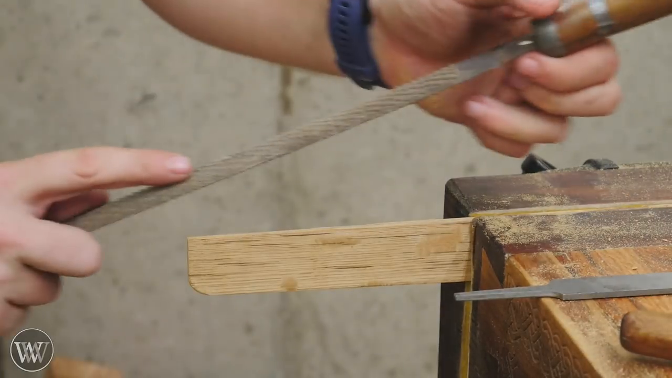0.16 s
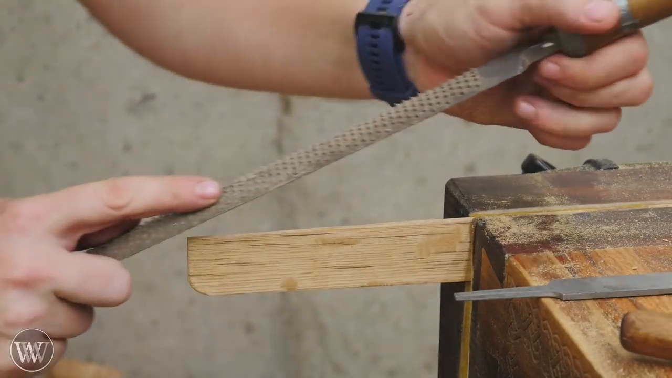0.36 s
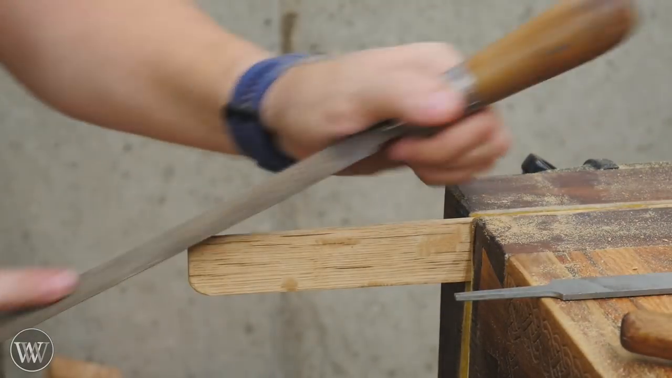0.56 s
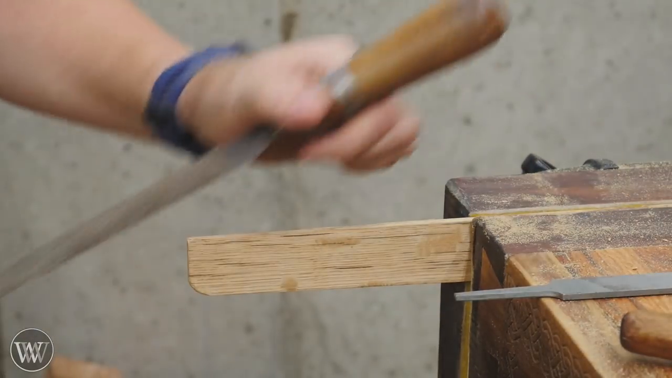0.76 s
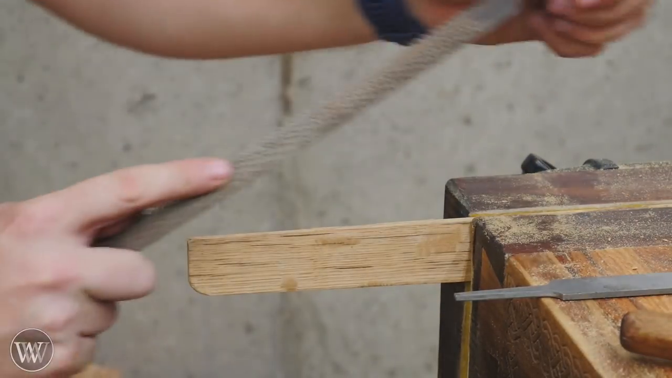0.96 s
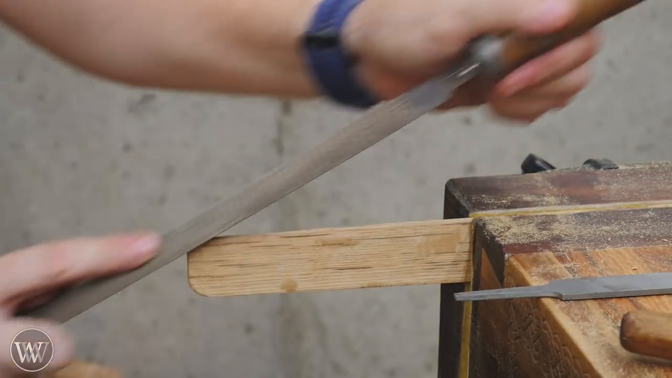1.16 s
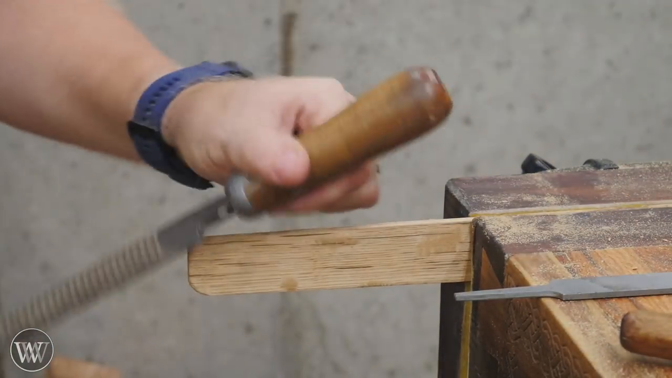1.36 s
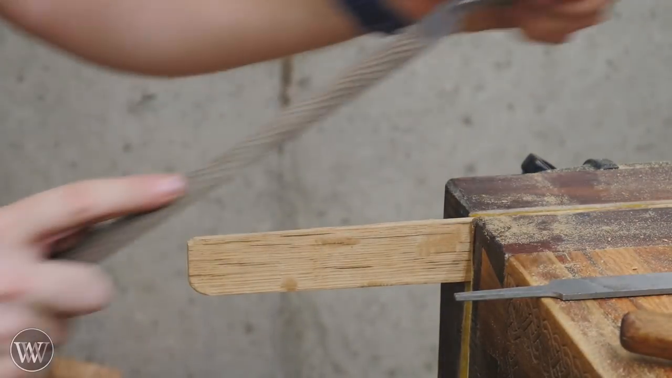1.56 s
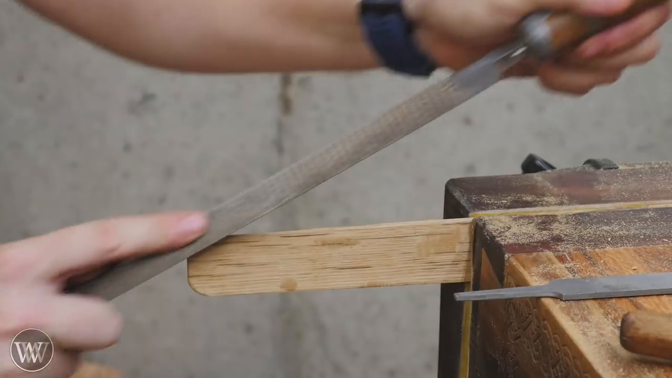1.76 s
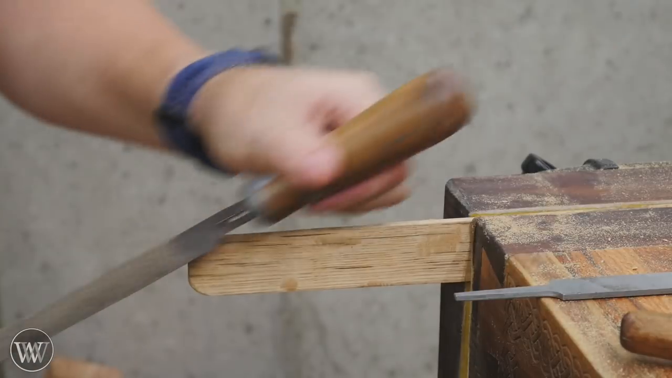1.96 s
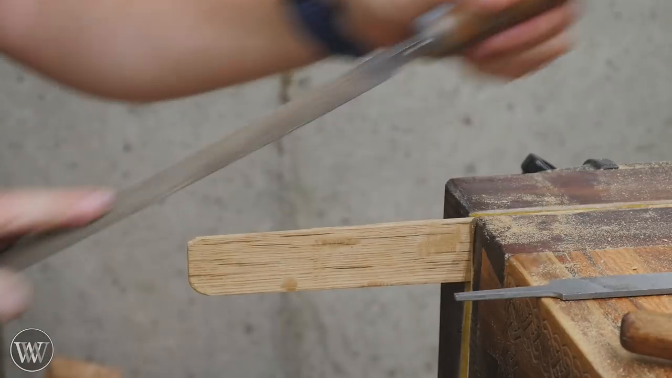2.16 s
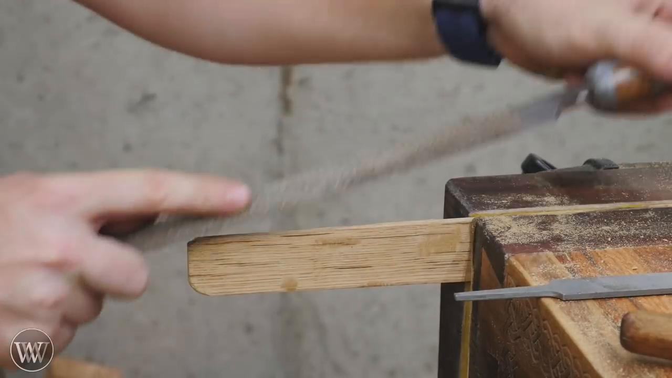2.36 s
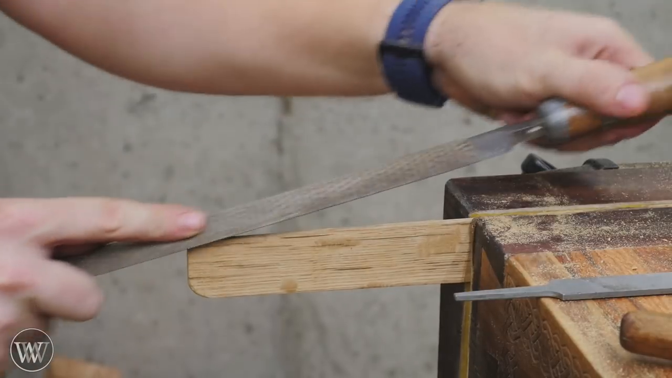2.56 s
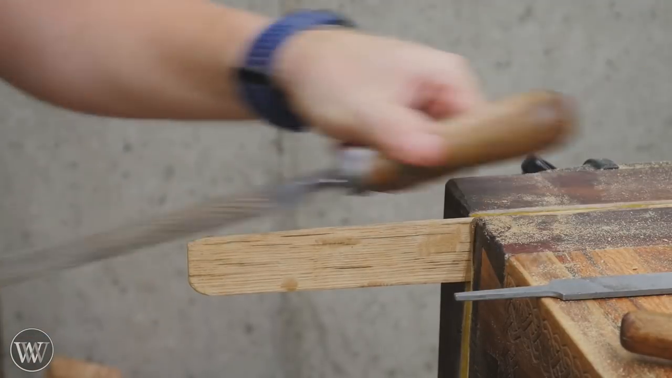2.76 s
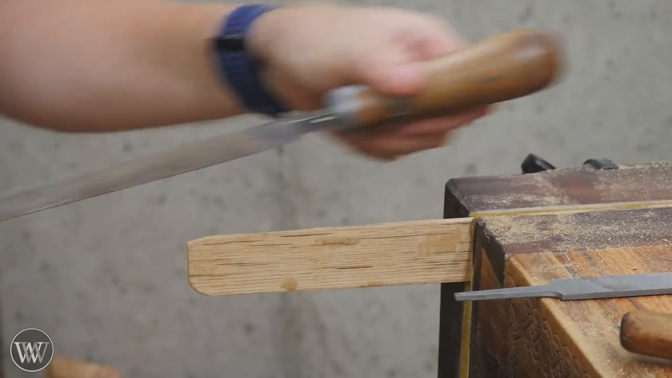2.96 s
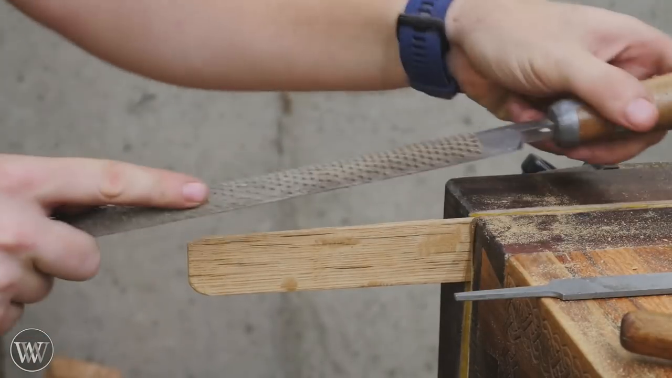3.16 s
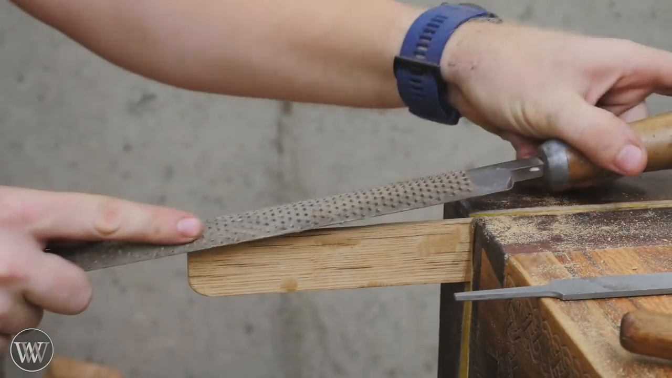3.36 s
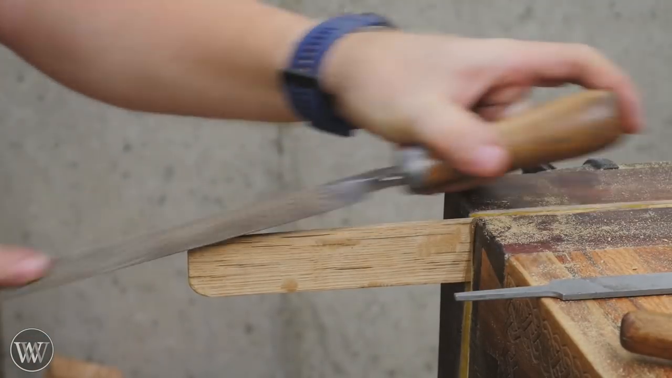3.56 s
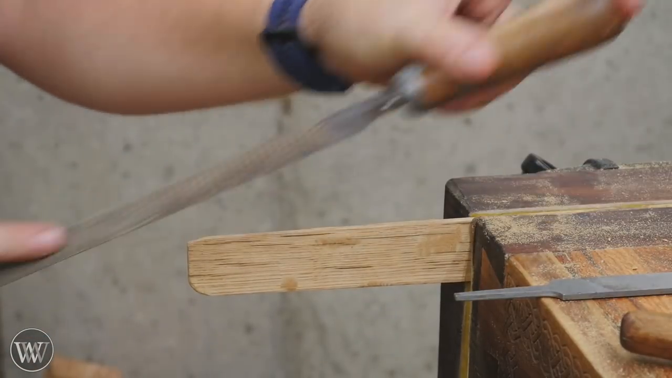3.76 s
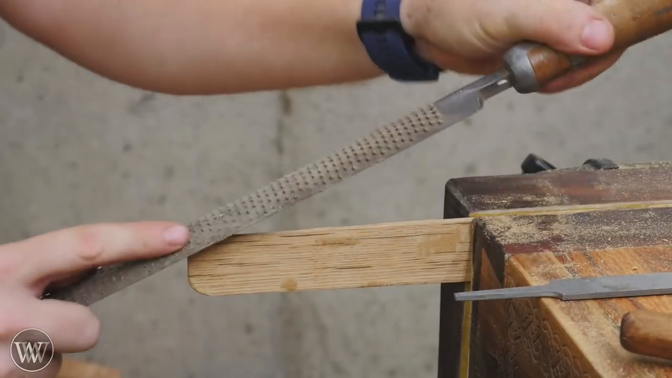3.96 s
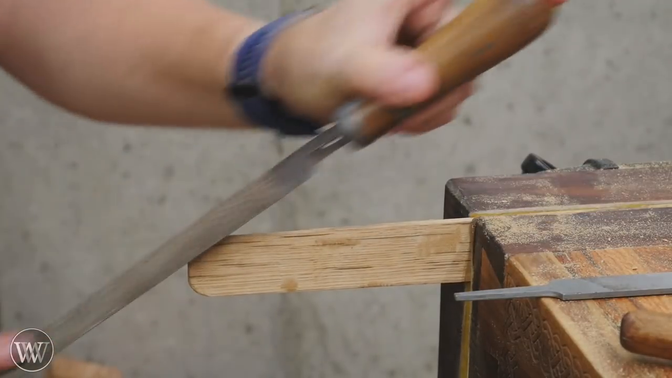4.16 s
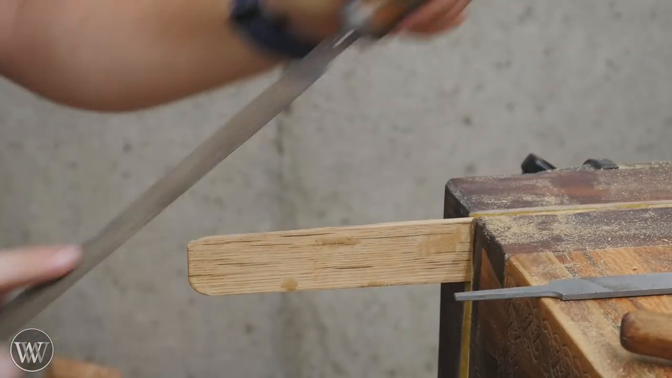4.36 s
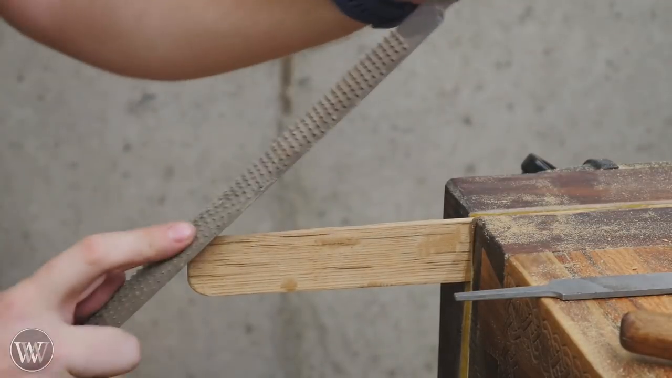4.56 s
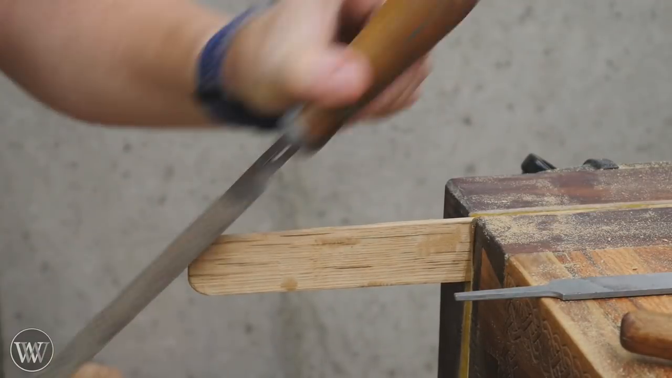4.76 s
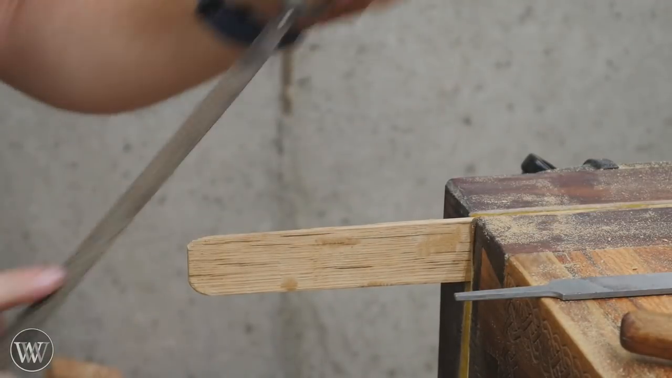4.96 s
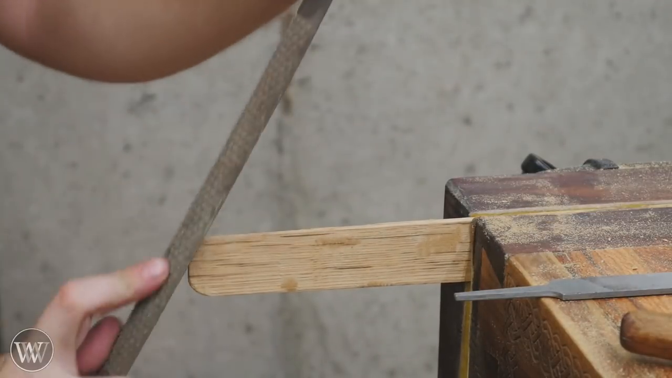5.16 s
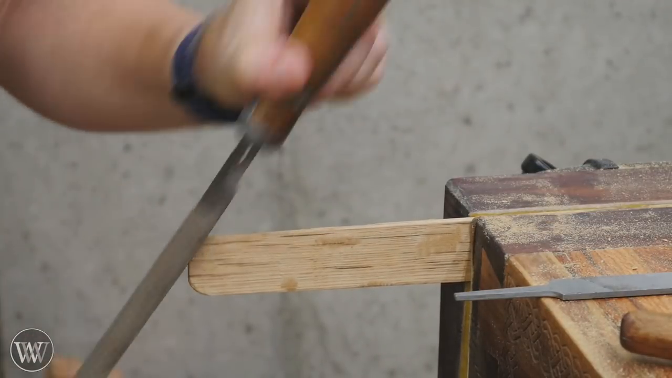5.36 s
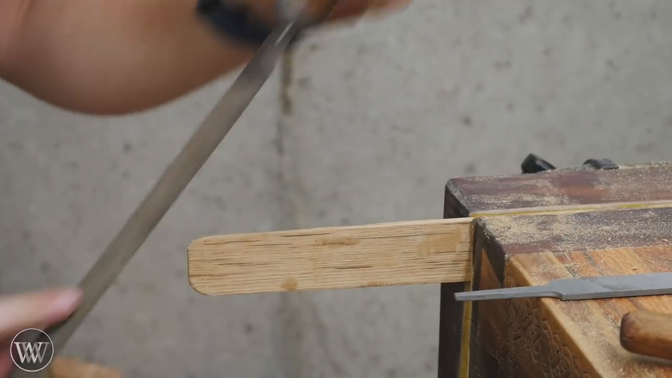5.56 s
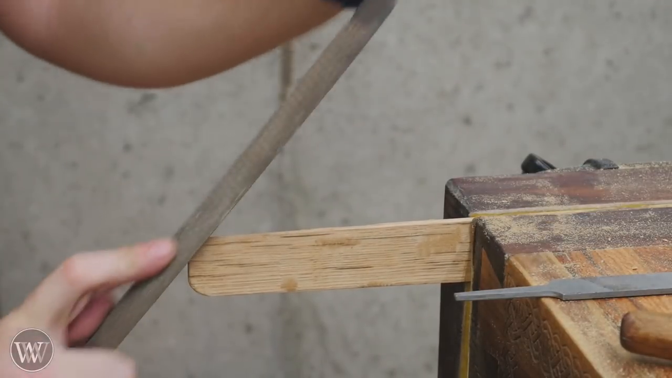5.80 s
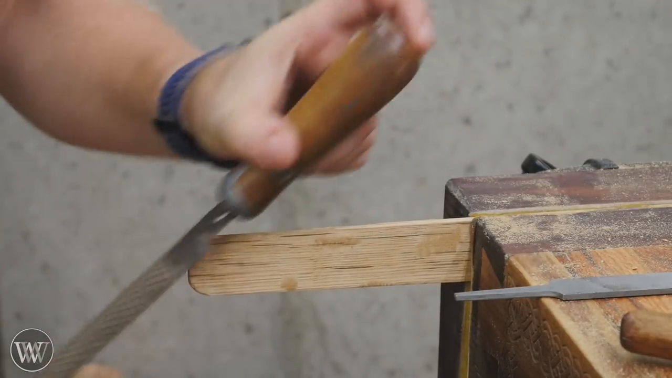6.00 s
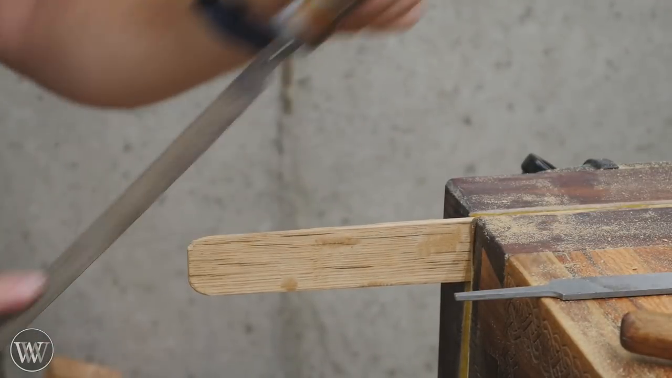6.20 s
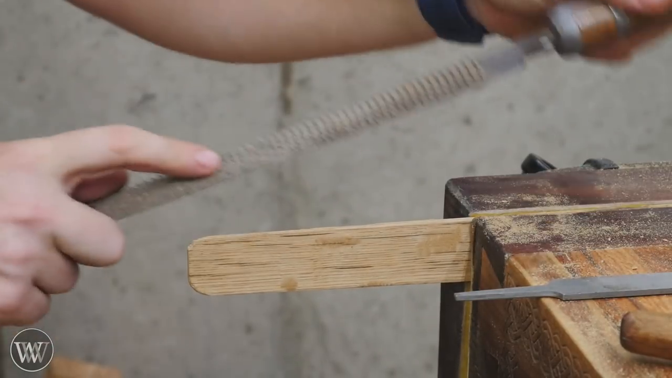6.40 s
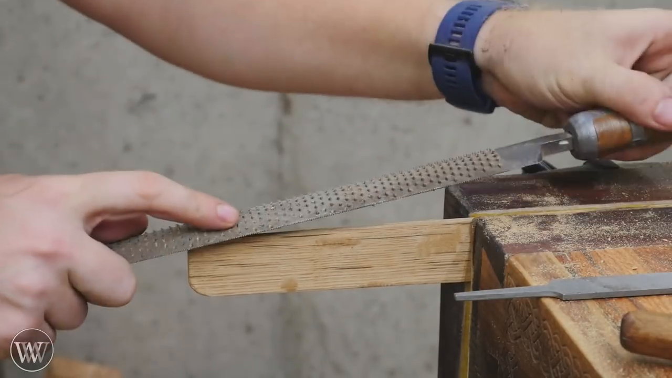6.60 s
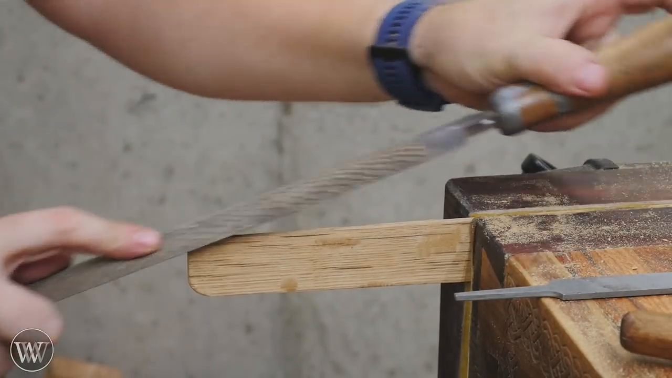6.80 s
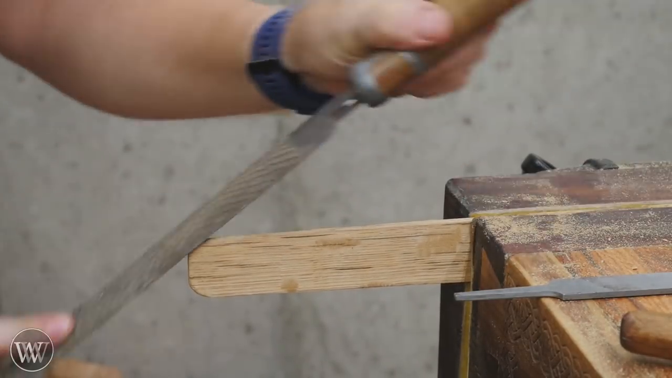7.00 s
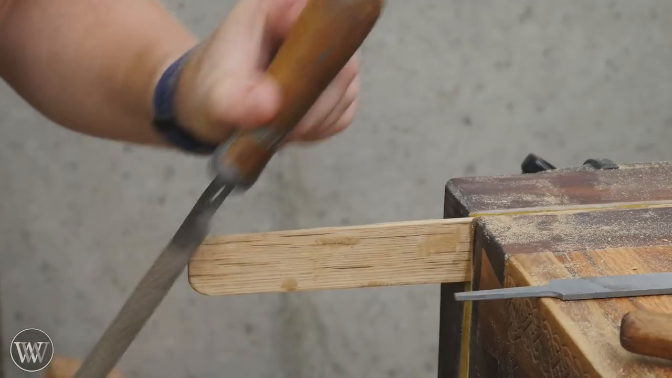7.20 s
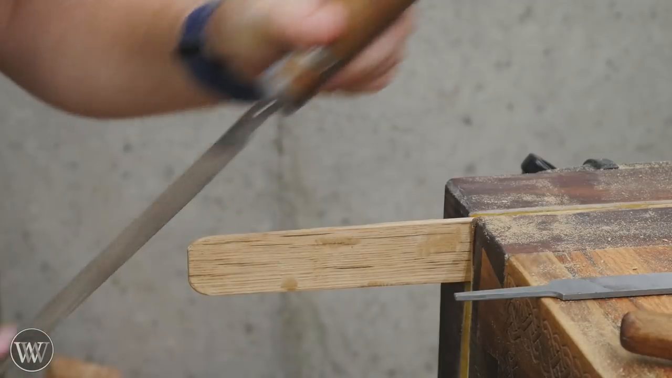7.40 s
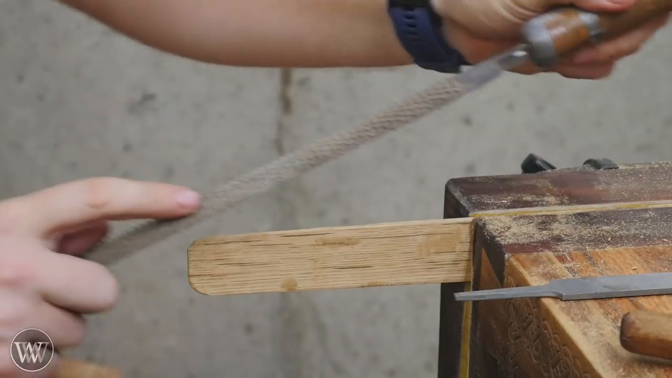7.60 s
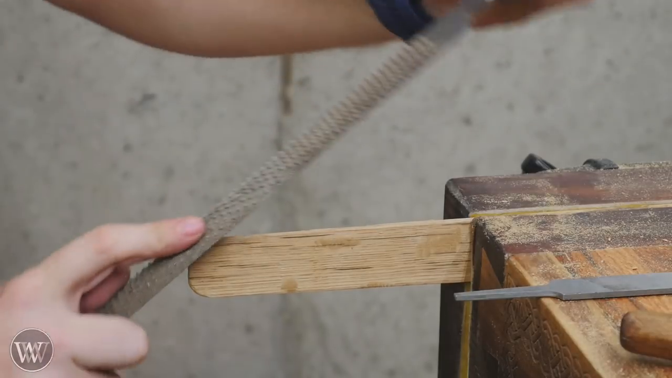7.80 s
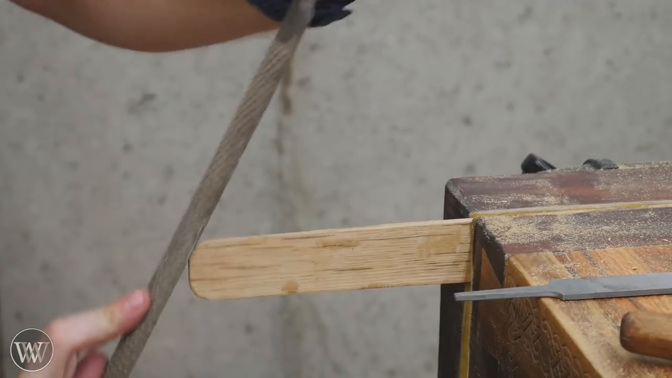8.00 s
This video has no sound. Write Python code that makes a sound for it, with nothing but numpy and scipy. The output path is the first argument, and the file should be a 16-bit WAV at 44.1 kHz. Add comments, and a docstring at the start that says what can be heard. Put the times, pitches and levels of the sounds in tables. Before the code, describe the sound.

Close and nearly mono in a small hard-walled shop, with faint steady air and low rumble throughout. From 0 to 0.4 s a palm brushes the handle, with dull knocks and a faint thin whistle. Short, coarse rasp strokes start near 0.55, 1.15 and 1.75 s, gritty and woody, splinters cracking in the first two; a metal tick comes at 1.64. A softer, longer stroke begins at 2.55 after a sleeve swish and airy whistle. Strokes follow near 3.4, 4.05, 4.65, 5.25 and 5.8, some in two shoves, with hollow barking, snaps and brief low twangs around 370 Hz. After a cloth swish, a long, light scrape at 6.7 runs into a firmer, crackling shove at 7.13. A dull low bump sounds at 7.47, a tiny tick at 7.56, a sharp landing tap at 7.73, then a final splintery stroke from 7.84, cut off around 8 s.

```python
"""A hand rasp is pushed over the end of a thin wooden strip held in a workbench, in a small hard-walled shop.
First the palm shifts its grip and the handle is knocked with dull taps over a low rumble and steady air.
Eleven strokes follow, some with a second shove: random tooth bites and snapping splinters drive resonances.
After pushes the strip twangs; between them sleeves swish, quick returns whistle and metal ticks.
A dull bump comes before the last stroke; decaying noise gives the answer of the walls throughout."""
import sys
import numpy as np
from scipy import signal
from scipy.fft import rfft, irfft, next_fast_len
from scipy.io import wavfile
from scipy.ndimage import map_coordinates

SR = 44100
rng = np.random.default_rng(int(sys.argv[2]) if len(sys.argv) > 2 else 0)


def store_pcm(level_fs):
    """Save levels as 16-bit WAV."""
    pcm = np.round(np.clip(level_fs, -1, 1) * 32767).astype(np.int16)
    wavfile.write(sys.argv[1], SR, np.atleast_2d(pcm).T)


N = 354637
TIME = np.arange(N) / SR
SIZE = 2 * next_fast_len(N // 2 + SR // 2)  # transform length, with room for tails
HZ = np.fft.rfftfreq(SIZE, 1 / SR)

# Pushes of the rasp, some opening with a light touch or followed by a second shove:
# start_s, rise_s, hold_s, entry_db, full_cut_db, then relative to the cut:
# bark_db and bending_db of the strip, closing twang_db, bench rocking_db
PUSHES = [ (0.549, .012, 0.024, -21.5, -20, 0.5, 3.5, -3, -14),
          (1.145, 0.14, 0.057, -22, -21, 3, 2.5, 1, -17),
          (1.747, 0.15, 0.075, -40.5, -19.5, 2, 0.5, -2, -26),
          (2.552, 0.087, 0.17, -46, -29.5, -2, -0.5, 3, -16.5),
          (3.44, .19, 0.024, -44, -28, -1, 1, 7.5, -22), (4.05, 0.063, .008, -45, -33.5, 0, -2, -20, -29),
          (4.113, 0.059, 0.047, -29.5, -21, 1.5, 3.5, 0, -41),
          (4.637, 0.074, 0.086, -34.5, -21, 1.5, 6, -3, -26.5),
          (5.229, 0.035, 0.004, -38, -35, -1, 10, 13, -9),
          (5.276, 0.039, 0.092, -24.5, -24.5, 5, 7.5, 1, -35.5),
          (5.802, 0.12, 0.071, -42.5, -21, 0.5, 2.5, -9, -38),
          (6.707, 0.14, 0.26, -50.5, -32, 0, 2.5, -22, -16),
          (7.134, 0.016, 0.038, -35, -26.5, 0.5, 4, 10, -15),
          (7.84, 0.011, 0.0065, -35, -38, -1.5, -2, -18, -11),
          (7.886, 0.045, 0.059, -36, -25.5, -2, 2, -20, -24),
          (7.994, .02, .022, -32, -30.5, 6.5, 8.5, -22, -11), ]
# Bending resonances of the strip: centre_hz, width_hz (before the damping floor in modes), level_db
STRIP_BENDING = [(327.3, 7.6, -9), (364.6, 16.4, 0.8), (387.4, 37, -4), (445, 19, -6), (496, 30.4, 0),
                 (540, 6.6, -8), (571, 3.1, -23), (645.3, 19, -1.5), (669, 70, -4), (790, 145, -14.5),
                 (792, 62, -20)]
# Higher, barking resonances of the strip: centre_hz, width_hz (before the floor), level_db
STRIP_BARK = [(1060, 37, -9), (1182, 94, -11), (1240, 19, -8), (1290, 144, -9), (1496, 35, -15.5),
              (1576, 47, -9), (1692, 9, -11), (1801, 3.7, -7.5), (1815, 100, -14), (1961, 27, -10.5),
              (2087, 23, -11), (2290, 190, -19)]
# Resonances of the steel blade: centre_hz, width_hz (before the floor), level_db
BLADE_MODES = [(3500, 120, 10), (4120, 500, -4), (4700, 370, -13), (7080, 280, 2.5)]
# Spectrum of the fizzing dust: frequency_hz, density_db (per Hz)
DUST_FIZZ = [(3000, -46), (6500, -4.5), (9600, 0.5), (11000, 1.5), (13000, -9), (15500, -7.5)]
# Spectrum of a sharp crack: frequency_hz, density_db (per Hz)
CRACK_SPECTRUM = [(300, -23), (900, 4), (1750, 7), (2700, 0.5), (3900, 6), (6000, -3.5), (9000, -14),
                  (15500, -35)]
# Spectrum of the steady air of the shop: frequency_hz, density_db (per Hz)
SHOP_AIR = [(65, -57), (110, 0), (279, 1.5), (366, 8.5), (967, -12), (1880, -14.5), (2840, -19),
            (4290, -19.5), (14600, -45), (15500, -50)]


def amp(db):
    """Amplitude ratio: 20 dB is a factor of ten."""
    return 10 ** (np.asarray(db) / 20)


def unit(x):
    """Normalisation by mean power: scale to rms 1."""
    return x / np.sqrt(np.mean(np.abs(x) ** 2) + 1e-20)


def along(points, hz):
    """Interpolation on a logarithmic frequency axis between (frequency_hz, value) points."""
    knots_hz, values = np.transpose(points)
    return np.interp(np.log(hz + 1), np.log(knots_hz), values)


def shape(points):
    """Spectral envelope: a gain that falls as frequency squared below its first point."""
    return amp(along(points, HZ)) * np.minimum(HZ / points[0][0], 1) ** 2


def modes(table):
    """Modal superposition: the powers of damped resonances add, with a steep skirt above the group."""
    power = 0
    for centre, width, db in table:
        width = max(width, (centre / 330) ** 2 + 7)  # least damping grows with pitch
        damping = (HZ * width) ** 2
        power = power + amp(db) ** 2 * damping / (damping + (HZ ** 2 - centre * centre) ** 2)
    return np.sqrt(power / (1 + (HZ / (2 * table[-1][0])) ** 4))


def ring(x, gain):
    """Minimum-phase filtering: a folded cepstrum makes the rms-normalised gain causal."""
    cepstrum = irfft(np.log(np.maximum(unit(gain), 1e-5)))
    cepstrum[1:SIZE // 2] *= 2
    cepstrum[SIZE // 2 + 1:] = 0
    response = np.exp(rfft(cepstrum))
    return irfft(rfft(x, SIZE) * response, SIZE)[..., :N]


def noise(points):
    """Filtered randomness: white noise takes on a spectrum and is scaled to rms 1."""
    return unit(ring(rng.standard_normal(N), shape(points)))


def wobble(rate):
    """Slow random modulation: a smooth curve through rate random knots a second."""
    return map_coordinates(rng.standard_normal(int(N * rate / SR) + 4), [TIME * rate])


def bursts(times, levels_db, t60):
    """Exponential decay: puffs of random-sign force lose 60 dB in t60 seconds, cut off at 0.2 s."""
    out, t = np.zeros(N + SR), np.arange(SR // 5) / SR
    for s, db in zip(times, levels_db):
        puff = amp(db - 60 * t / t60) * rng.choice([-1, 1], len(t))
        out[round(s * SR):][:len(t)] += puff
    return out[:N]


def push(start, rise, hold, entry_db, full_db, release, grows_db=0):
    """Force envelope: teeth catch, the arm leans in and holds, then lets go at release dB a second."""
    attack_s, firm_db, attack_grows = 0.0062, -23, 0.75  # a lighter entry catches more slowly
    t = TIME - start
    catching = np.clip(t / (attack_s * amp(firm_db - entry_db) ** attack_grows), 0, 1)
    leaning_db = (entry_db - full_db) * (1 - np.clip(t / rise, 0, 1)) ** 2
    travel = np.clip(t / (rise + hold), 0, 1) - .5
    release_db = release * np.maximum(t - rise - hold, 0)
    return catching * amp(full_db + leaning_db + grows_db * travel - release_db)


def slowing(s, rise, fall):
    """Kinematics: shortfall from an arm's top speed, 0 at s, 1 one rise before or one fall after."""
    return np.maximum((s - TIME) / rise, (TIME - s) / fall) ** 2


def moves(table):
    """Friction noise grows with speed: each arm move is loudest where it is fastest."""
    edge_db = 19.5  # quieter by this much one rise before and one fall after
    return sum(amp(db - edge_db * np.minimum(slowing(s, rise, fall), 10)) for s, rise, fall, db in table)


def workshop(x):
    """Diffuse reverberation: noise decaying band by band, after a 5 ms gap, answers for the walls."""
    # Reverberation time of the shop: frequency_hz, t60_s
    decay_times = [(150, 0.4), (450, 0.47), (1800, 0.42), (4000, 0.37), (9000, 0.4), (15000, 0.19)]
    hz, t, bands = signal.stft(rng.standard_normal(SR // 2), SR, nperseg=256)
    decay = amp(-60 * t / along(decay_times, hz)[:, None])
    tail = signal.istft(bands * decay, SR, nperseg=256)[1]
    response = np.pad(tail, (SR // 200, 0)) / np.linalg.norm(tail)
    return signal.fftconvolve(x, response)[:N]


def background():
    """Structure-borne sound: pushes rock the bench into a rumble, joined by a dull bump and steady air."""
    # Spectrum of the low rumble: frequency_hz, density_db (per Hz)
    rumble_spectrum = [(20, -11), (38, -13), (54, 5.5), (80, -4), (125, -4.5), (220, -28)]
    # Spectrum of the dull bump: frequency_hz, density_db (per Hz)
    bump_spectrum = [(15, -24), (25, 0), (48, -5), (81, 0.5), (194, -6), (220, -2.5), (461, -24.5),
                     (515, -40), (700, -30), (910, -59), (1540, -120)]
    rock_release_db_per_s, steady_db = 59, -52
    bump_s, bump_rise_s, bump_db, bump_db_per_s = 7.468, 0.015, -22, 174
    shudder_db, shudder_db_per_s = -37, 29  # slower decay left by the bump
    rocking = np.zeros(N)
    for start, rise, hold, _, full_db, *_, rock_db in PUSHES:
        level_db = full_db + rock_db
        rocking += push(start, rise, hold, level_db, level_db, rock_release_db_per_s)
    rumble = noise(rumble_spectrum) * np.hypot(amp(steady_db), rocking)
    t = np.maximum(TIME - bump_s, 0)
    decay = amp(bump_db - bump_db_per_s * t) + amp(shudder_db - shudder_db_per_s * t)
    bump = np.minimum(t / bump_rise_s, 1) * decay
    return rumble + bump * noise(bump_spectrum) + amp(-55.0) * noise(SHOP_AIR)


def whistle():
    """Pitch proportional to speed: three thin lines rise and fall with each quick return."""
    # Quick returns of the arm: fastest_s, rise_s, fall_s, top_pitch_hz (middle line, before waver), level_db
    return_table = [(.085, .05, .07, 11000, -56), (2.27, .2, .2, 12200, -60), (3.97, .2, .2, 10700, -62),
                    (4.39, .1, .2, 8900, -68), (6.32, .2, .48, 12700, -59)]
    sag, edge_db = .35, 6  # share of pitch and decibels lost towards both ends of a return
    out = np.zeros(N)
    waver = 1 + .016 * wobble(20) + .003 * wobble(900)
    lines = [(ratio, amp(4.5 * wobble(18))) for ratio in (.885, 1, 1.19)]
    for s, rise, fall, hz, db in return_table:
        slow = slowing(s, rise, fall)
        on = slow < 1
        speed = 1 - sag * np.sin(np.pi / 2 * np.sqrt(slow[on])) ** 2
        phase = 2 * np.pi * np.cumsum(hz * speed * waver[on]) / SR
        fade = np.minimum(10 * (1 - slow[on]), 1)
        loudness = amp(db - edge_db * slow[on]) * fade
        out[on] += loudness * sum(gain[on] * np.sin(ratio * phase) for ratio, gain in lines)
    return out


def sleeves():
    """Friction noise: palm and cloth hiss with the speed of the arms, and the returns whistle."""
    # The palm shifts its grip: fastest_s, rise_s, fall_s, level_db
    grip_table = [(.07, 0.23, 0.41, -34), (.29, 0.028, 0.052, -41)]
    # Sleeves swish as the arms draw back: fastest_s, rise_s, fall_s, level_db
    swish_table = [(.775, 0.077, 0.084, -40.5), (.94, 0.044, 0.081, -50.5), (2.27, 0.14, 0.12, -43.5),
                   (2.89, 0.083, 0.14, -42), (3.38, 0.096, 0.082, -52), (4.02, 0.17, 0.23, -48),
                   (6.34, 0.2, 0.42, -45), (7.37, 0.11, 0.23, -48)]
    # Spectrum of the palm: frequency_hz, density_db (per Hz)
    palm_spectrum = [(410, -10), (700, -1), (1250, -7), (1560, 0.5), (1760, -5.5), (3820, -5),
                     (15500, -14.5)]
    # Spectrum of the cloth: frequency_hz, density_db (per Hz)
    cloth_spectrum = [(410, -29), (700, -2), (1070, -13), (1760, -5.5), (3320, -9), (4030, -1.5),
                      (5360, -2), (6760, -11.5), (10900, -8.5), (15500, -13)]
    palm = moves(grip_table) * noise(palm_spectrum)
    cloth = moves(swish_table) * noise(cloth_spectrum)
    return (palm + cloth) * amp(1.6 * wobble(35)) + whistle()


def clinks():
    """Impulsive excitation: something of metal held in the hand rattles and rings damped modes."""
    # Metal ticks while the rasp is lifted clear: start_s, level_db (before the common trim)
    tick_table = [(1.6436, -15), (2.238, -34.5), (3.0856, -22), (3.9617, -24), (7.5578, -22)]
    # Resonances of the metal: centre_hz, width_hz (before the floor in modes), level_db
    metal_modes = [(1720, 300, -1), (3500, 1500, -7), (5337, 450, -8), (8100, 2500, -15.5),
                   (10700, 400, -9.5), (13160, 1500, -16)]
    s, db = np.transpose(tick_table)
    return ring(bursts(s, db - 10.5, t60=0.0077), modes(metal_modes))


def taps():
    """Impact excitation: steel on wood gives a crack, a dull knock and a short skitter of the teeth."""
    # The handle is knocked, or the blade lands or snags on the strip; levels before the trims below:
    # start_s, peak_db, knock_db, crack_db
    impact_table = [(0.034, -25, -16.5, -41), (0.284, -26, -34, -38), (0.364, -12, -32.5, -60),
                    (1.75, -25, -29, -20), (2.449, -24, -30.5, -26.5), (3.34, -20, -37.5, -38.5),
                    (4.011, -45, -35, -33.5), (4.585, -37, -30.5, -28.5), (5.23, -37, -36, -29.5),
                    (5.778, -16.5, -31.5, -34), (6.614, -28, -37.5, -28.5), (7.726, 11.5, -27, -19),
                    (7.997, 17, -18, -28)]
    # Spectrum of the knock: frequency_hz, density_db (per Hz)
    knock_spectrum = [(40, -47), (130, -11.5), (260, 10.5), (800, -5.5), (1000, -15), (2000, -42),
                      (4000, -66)]
    s, peak_db, knock_db, crack_db = np.transpose(impact_table)
    knock = ring(bursts(s, knock_db - 3.5, t60=0.37), shape(knock_spectrum))
    knock += ring(bursts(s, knock_db - 5.0, t60=0.19), modes(STRIP_BENDING))
    skitter = ring(bursts(s, crack_db - 9, t60=0.25), modes(STRIP_BARK))
    impact = bursts(s, crack_db - 4.0, t60=0.058) + bursts(s, peak_db - 23.5, t60=0.0027)
    return knock + skitter + ring(impact, shape(CRACK_SPECTRUM))


def snaps():
    """Sudden stress release: a splinter jolts and crackles, pinging blade and strip."""
    # Splinters snap under the teeth: start_s, jolt_db (before filtering)
    splinter_table = [(0.605, -3), (1.164, -7.5), (4.6536, -21), (4.684, -12), (5.2829, -17), (5.326, -4),
                      (5.358, -4), (5.896, -4), (6.817, -4), (7.072, -7.5), (7.113, -4), (7.1465, 0),
                      (7.8593, -19), (7.8944, -10), (7.925, -3.5), (7.9965, -4.5)]
    s, jolt_db = np.transpose(splinter_table)
    jolts = np.bincount(np.round(s * SR).astype(int), amp(jolt_db), N)
    crackle = bursts(s, jolt_db - 6, t60=0.0064)
    crack = ring(amp(0.5) * jolts + crackle, shape(CRACK_SPECTRUM))
    fizz = amp(-8.0) * ring(jolts, shape(DUST_FIZZ))
    blade = amp(3) * ring(jolts, modes(BLADE_MODES))
    bark = amp(-13) * ring(jolts, modes(STRIP_BARK))
    return crack + fizz + blade + bark


def twangs():
    """Free vibration: after each push a bending tone swells, sharpens as the load comes off, and dies."""
    delay_s, free_hz, scatter = .05, 373.7, .015  # scatter: random share of pitch from push to push
    out = np.zeros(N)
    for start, rise, hold, _, full_db, _, _, twang_db, _ in PUSHES:
        s = start + rise + hold + delay_s
        near = np.abs(TIME - s) < .3
        t = TIME[near] - s
        life = 2 / (np.exp(-t / .012) + np.exp(t / .022))
        loading = .08 / (1 + np.exp((t + 0.012) / 0.016))  # the pitch begins up to 8 % flat
        pitch_hz = free_hz * (1 + scatter * rng.standard_normal()) * (1 - loading)
        cycles = np.cumsum(pitch_hz) / SR + rng.random()
        out[near] += amp(full_db + twang_db) * life * np.sin(2 * np.pi * cycles)
    return out


def teeth(rate, spread_db):
    """Random impulse train: single teeth bite at random moments with uneven force."""
    bites = rng.random(N) < rate / SR
    force = amp(spread_db * np.clip(rng.standard_normal(N), -2, 2))
    return unit(bites * rng.choice([-1, 1], N) * force)


def chips(rate, spread_db):
    """Irregular renewal process: whole rows of teeth break out chips at an uneven pace."""
    times = np.cumsum(rng.uniform(.25, 1.75, 2000)) / rate
    sizes_db = spread_db * np.clip(rng.standard_normal(len(times)), -2, 1)
    inside = times < (N - 1) / SR
    return unit(bursts(times[inside], sizes_db[inside], t60=.003))


def contact(x, t60, share_db, count=3):
    """Moving excitation point: dense damped modes colour x in a mix that shifts along the blade."""
    t = np.arange(SR // 25) / SR
    tails = rng.standard_normal((count, len(t))) * amp(-60 * t / t60)
    tails /= np.linalg.norm(tails, axis=1, keepdims=True)
    blend = np.array([wobble(9) for _ in tails])
    blend /= np.linalg.norm(blend, axis=0)
    answers = signal.fftconvolve(x[None], tails, axes=1)[:, :N]
    coloured = np.sum(blend * answers, axis=0)
    return (x + amp(share_db) * coloured) / np.hypot(1, amp(share_db))


def rasping():
    """Forced vibration: tooth bites, clumped by blade chatter, drive fibres, blade, strip and bench."""
    # Spectrum of the tearing fibres: frequency_hz, density_db (per Hz)
    tearing_spectrum = [(1500, -39.5), (2300, -7.5), (2850, -8), (3450, 2.5), (4800, 2.5), (5700, -3.5),
                        (7200, -6), (8600, -6), (9700, -17.5), (15500, -22.5)]
    # Resonances of the bench: centre_hz, width_hz (before the floor in modes), level_db
    bench_modes = [(124.4, 12.7, -12.5), (140, 39, -11.5), (213, 11, -4), (237.3, 17, -3.5)]
    rocking_modes = [(84, 130, 0), (142, 34, 0.013)]  # same columns
    cut_release, bark_release, bend_release = 292, 181, 167  # dB per s as the load comes off
    bark_grows_db, bend_grows_db = 2, 4.5  # the strip answers more from start to end of a push
    cut, bark, bend, rock = np.zeros((4, N))
    for *gesture, bark_db, bend_db, _, rock_db in PUSHES:
        force = push(*gesture, cut_release)
        cut += force
        rock += amp(rock_db) * force
        bark += amp(bark_db) * push(*gesture, bark_release, bark_grows_db)
        bend += amp(bend_db) * push(*gesture, bend_release, bend_grows_db)

    chatter = unit(amp(1.47 * wobble(260) + 0.97 * wobble(60)))
    coarse = amp(-2) * chips(rate=165, spread_db=4)
    bites = unit(chatter * teeth(rate=2200, spread_db=3) + coarse)
    fibres = unit(bites + amp(-1.5) * chatter * teeth(rate=12000, spread_db=12.0))
    # Well above -33.5 dB of cut, dust fizz and bench shudder grow more slowly than the cut.
    drag = cut / (cut + amp(-33.5)) * cut ** 0.35

    tearing = amp(-0.8) * ring(cut * fibres, shape(tearing_spectrum))
    dust = coarse + chatter * teeth(rate=6600, spread_db=2)
    fizz = amp(-28.0) * ring(drag * dust, shape(DUST_FIZZ))
    # The blade sings more or less as the contact passes its nodes.
    singing = unit(amp(1.9 * wobble(7)))
    blade_force = cut * singing * chatter * teeth(rate=1500, spread_db=6.5)
    blade = amp(-9) * ring(blade_force, modes(BLADE_MODES))
    barking = amp(-0.62) * contact(ring(bark * bites, modes(STRIP_BARK)), t60=0.022, share_db=-1.5)
    bending = amp(-2.0) * ring(bend * bites, modes(STRIP_BENDING))
    bench = amp(-19.0) * ring(drag * bites, modes(bench_modes))
    bench += amp(3) * ring(rock * bites, modes(rocking_modes))
    return contact(tearing + fizz, t60=0.016, share_db=-9) + blade + barking + bending + bench


def scene():
    """Mid-side sum, nearly mono: a faint side is the filtered, phase-turned centre plus weak noise."""
    # Level of the faint side: frequency_hz, side_db (against the centre, before the trims below)
    side_levels = [(60, -33), (180, -46), (550, -43.5), (1650, -38.5), (4970, -31.5), (15000, -27)]
    work, ticks = rasping() + taps(), snaps()
    near = amp(-1.7) * work + twangs() + ticks + clinks() + sleeves() + background()
    mid = near + amp(-9.5) * workshop(work) + amp(-5.0) * workshop(ticks)
    # The centre is smeared by a decaying noise filter and also turned by a quarter cycle.
    unlike = amp(-4) * rfft(workshop(mid), SIZE) + amp(9.5) * 1j * rfft(mid, SIZE)
    side = irfft(unlike * amp(along(side_levels, HZ)), SIZE)[:N] + amp(-72) * noise(SHOP_AIR)
    return np.array([mid + side, mid - side])


def record(dry):
    """Soft saturation and band limiting: the highest peaks are rounded and the top octave's end is cut."""
    top_hz = 15800
    rounded = dry / (1 + (dry / .8) ** 6) ** (1 / 6)
    return irfft(rfft(rounded, SIZE) / (1 + (HZ / top_hz) ** 160), SIZE)[:, :N]


dry = scene()
out = record(dry)
store_pcm(out)
```